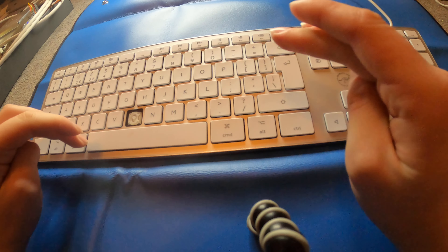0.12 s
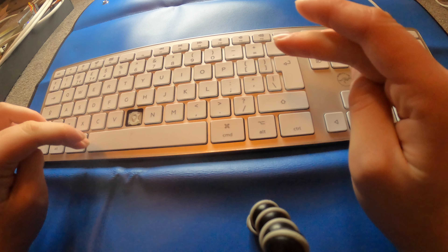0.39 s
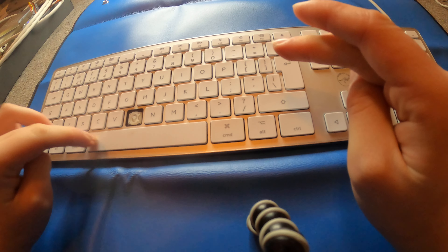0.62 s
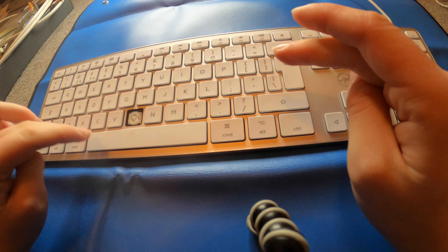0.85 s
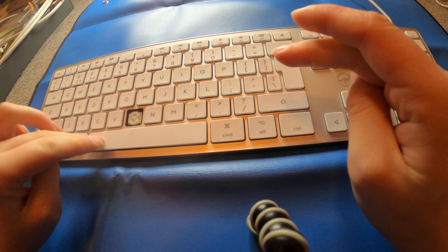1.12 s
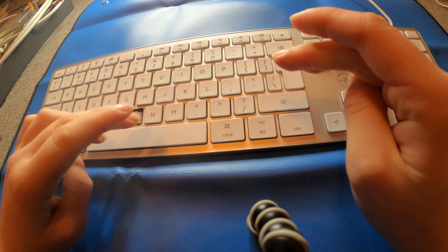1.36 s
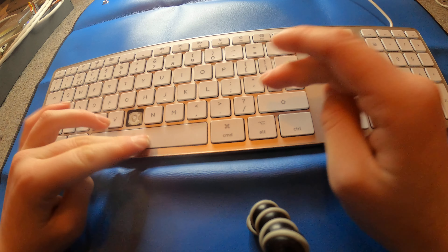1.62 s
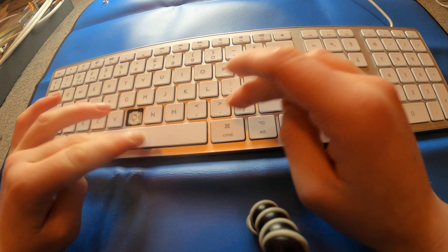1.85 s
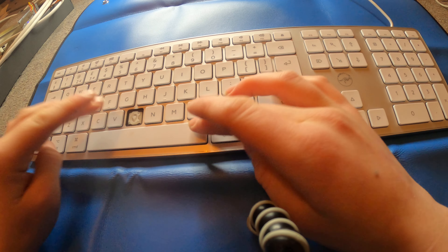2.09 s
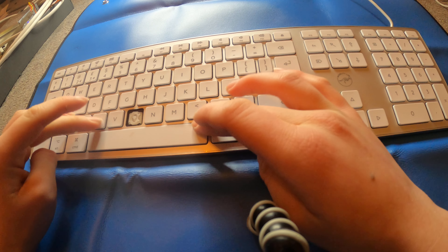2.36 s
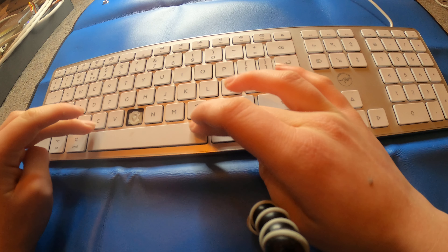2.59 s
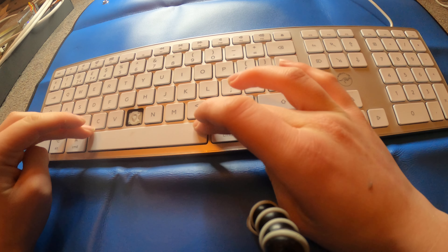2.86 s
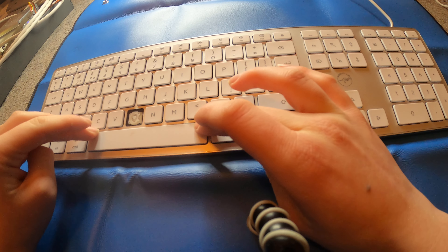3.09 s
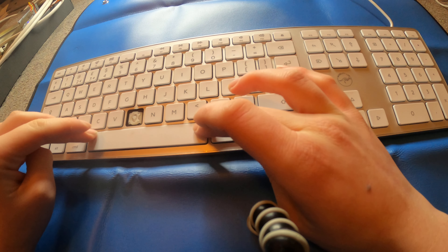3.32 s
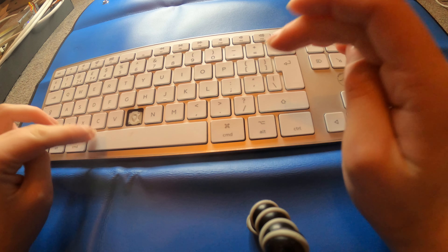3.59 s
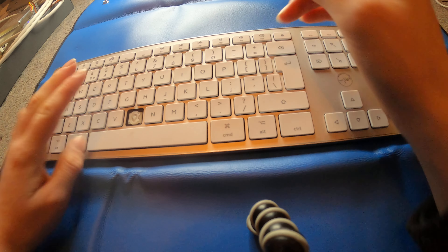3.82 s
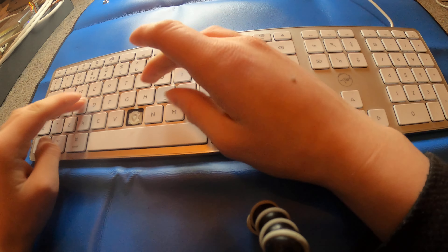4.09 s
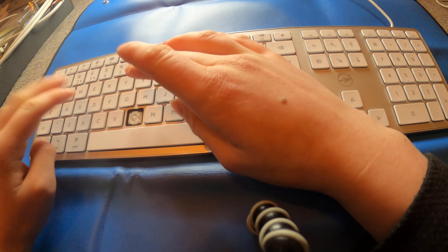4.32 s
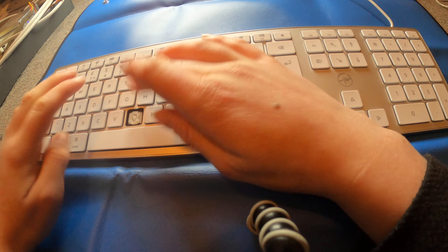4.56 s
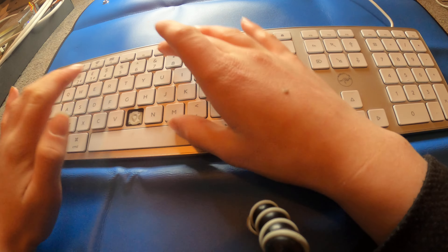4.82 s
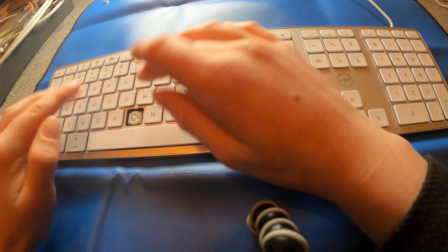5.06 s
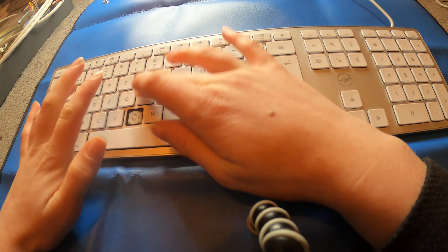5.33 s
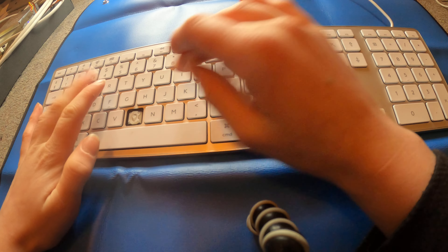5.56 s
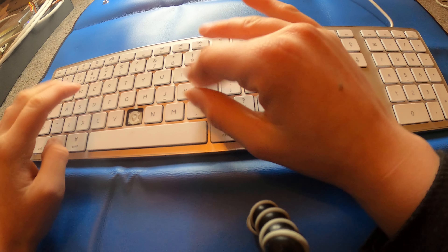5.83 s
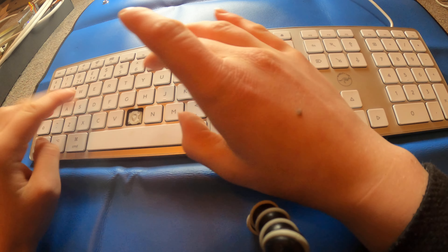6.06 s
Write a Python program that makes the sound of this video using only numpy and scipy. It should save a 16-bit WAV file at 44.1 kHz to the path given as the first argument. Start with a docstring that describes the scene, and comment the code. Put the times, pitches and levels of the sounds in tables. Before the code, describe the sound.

Fingertips tap a thin metal keyboard in uneven bursts, clicky with dull thuds beneath, as hands rustle over cloth and a faint hum fades.

```python
"""Close stereo pickup, about six seconds, of fingertips on a thin metal keyboard with low plastic keys on a padded mat.
It opens on air, a faint wavering low hum and hands rustling over cloth; two firm bursts of typing follow.
Softer keys come next, with loose caps ticking at random; then two firm strokes, settling wrists and a strong sweep of cloth.
The hum has sunk away by then; more typing runs to the end. Each stroke is noisy cap ticks, a ringing knock in the plate,
a damped thud into the mat and a deep shove; a short diffuse tail of noise is the small soft room."""
import sys
import numpy as np
from scipy import signal
from scipy.fft import rfft, irfft
from scipy.io import wavfile

SR = 44100
rng = np.random.default_rng(int(sys.argv[2]) if len(sys.argv) > 2 else 0)


def materialize(psi):
    """Save the field psi as 16-bit PCM at rate SR to the path in sys.argv[1].

    A 1-D psi becomes a single channel; in a 2-D psi each row is a channel.
    """
    bounded = np.clip(np.atleast_2d(psi).T, -1, 1)
    quanta = np.round(bounded * 32767).astype(np.int16)
    wavfile.write(sys.argv[1], SR, quanta)


def nominal_scale(level):
    """Amplitude ratio for a level in decibels (scalar or array-like)."""
    x = np.asarray(level, float) / 20
    return 10 ** x


N = 272538   # length in samples


def rms_one(x):
    """Scales a signal to an rms of 1."""
    return x / np.sqrt(np.mean(x ** 2) + 1e-20)


def at_hz(points, hz):
    """Reads a (Hz, value) curve along a logarithmic pitch axis."""
    curve_hz, value = np.transpose(points)
    return np.interp(np.log(hz), np.log(curve_hz), value)


def drift(rate_hz):
    """Random wander of rms 1: noise through two equal low-pass poles, made at every 40th sample."""
    pole = np.exp(-2 * np.pi * rate_hz * 40 / SR)
    noise = rng.standard_normal(N // 40 + 2002)
    slow = signal.lfilter([1], [1, -2 * pole, pole * pole], noise)[2000:]   # settled part only
    return np.interp(np.arange(N) / 40, np.arange(len(slow)), rms_one(slow))


def coloured(spectrum, alike):
    """Stereo noise of rms 1 with a given spectrum; alike is the left-right correlation."""
    hz = np.maximum(np.fft.rfftfreq(N, 1 / SR), 1)
    white = rfft(rng.standard_normal((2, N)))
    mid, side = irfft(white * nominal_scale(at_hz(spectrum, hz)), N)
    alike = np.clip(alike, 0, 1)
    opposed = side * np.array([[1], [-1]])
    return rms_one(np.sqrt(1 + alike) * mid + np.sqrt(1 - alike) * opposed)


def add(out, s, wave):
    """Mixes a short sound in at a time in seconds."""
    i = round(s * SR)
    out[..., i:i + wave.shape[-1]] += wave[..., :N - i]


# Colour of the air around the microphone. Each row: frequency in Hz, relative density in dB per Hz.
AIR_COLOUR = [(15, -40.5), (25, -7), (90, -7), (213, 6.5), (438, -12), (488, -5), (691, -35), (1630, -20),
              (3260, -25), (7000, -22), (15000, -40)]


def air():
    """Steady background noise, mostly low, identical left and right."""
    return nominal_scale(-69.5) * coloured(AIR_COLOUR, alike=1.0)


# The hum behind the keyboard, joined by straight lines. Each row: time in seconds, pitch in Hz before its jitter,
# level in dB before its flutter, level of the partial a fifth above in dB before its flutter.
HUM_PATH = [(0, 205, -59, -68.5), (.15, 206, -63.5, -73), (.3, 196, -57, -76.5), (.6, 194, -54, -72.5),
            (.8, 196, -59, -72), (1.1, 197, -56, -72.5), (1.35, 201, -63, -70.5), (1.5, 200, -70, -80.5),
            (2.1, 207, -63.5, -86), (2.5, 209, -55.5, -76), (2.9, 210, -58.5, -89.5),
            (3.2, 212, -63, -78.5), (3.5, 215, -84.5, -73.5), (3.9, 212, -74.5, -78.5),
            (4.3, 215, -79.5, -96), (4.6, 220.7, -78.5, -102.5)]


def hum():
    """A low tone with weak partials a fifth above and an octave below, unsteady in pitch and strength."""
    s, *columns = np.transpose(HUM_PATH)
    hz, db, fifth_db = [np.interp(np.arange(N) / SR, s, column) for column in columns]
    phase = 2 * np.pi * np.cumsum(hz * (1 + 0.017 * drift(45))) / SR
    tone = 0
    for ratio, level_db in [(1, db), (3 / 2, fifth_db), (1 / 2, db - 20)]:
        tone = tone + nominal_scale(level_db + 2.4 * drift(8.4)) * np.sin(ratio * phase)
    return np.sqrt(2) * tone


# Hands and sleeves sweeping over cloth. Each row: loudest moment in seconds, level there in dB before grain and drag,
# time to swell by 10 dB in seconds, time to fade by 10 dB in seconds (the sign of both times has no effect).
CLOTH_SWEEPS = [(0, -61.5, .04, -0.0417), (.18, -65.5, -3.0437, 0.0773), (0.421, -78.5, -3.4017, 0.1321),
                (.8, -72, 0.217, 0.52), (1.301, -60.5, -0.0443, 0.0511), (1.7, -61.5, 0.1084, 0.3517),
                (2.2, -64, 0.0408, 0.159), (2.52, -68.5, 0.1718, 0.0948), (2.85, -72.5, 0.1305, 0.24),
                (3.05, -61, 0.0893, 0.1804), (3.56, -60, -0.0068, 0.1958), (3.85, -42.5, 0.1187, 0.1664),
                (4.051, -51, 0.1067, 0.0833), (4.2, -65.5, 0.0668, 0.0008), (4.48, -74.5, 1.2989, 0.0638),
                (4.82, -62.5, 0.1774, 0.357), (5.42, -57, 0.1607, -0.0782), (5.55, -61, 0.0668, 0.1781),
                (5.71, -58, 0.033, 0.195), (6.03, -58.5, 0.0581, 0.1072)]


def sweep_db():
    """Level of all sweeps together; each swells to a rounded top and fades."""
    t, power = np.arange(N) / SR, 1e-12
    for s, db, swell_s, fade_s in CLOTH_SWEEPS:
        fall_db = 10 * ((t - s) / np.where(t < s, swell_s, fade_s)) ** 2
        power = power + nominal_scale(db - fall_db) ** 2
    return 10 * np.log10(power)


# Colour of the cloth before the drag. Each row: frequency in Hz, relative density in dB per Hz.
CLOTH_COLOUR = [(90, -35.5), (200, -2), (450, -5.5), (800, -7), (1500, -0.5), (2300, -5), (3500, -10),
                (6000, -22.5), (9000, -31.5), (15000, -51.5)]


def rustle():
    """Friction noise that catches and slips; a firm sweep drags the cloth and fills in the lows."""
    db = sweep_db()
    noise = coloured(CLOTH_COLOUR, alike=0.78)
    lows = signal.sosfilt(signal.butter(2, 900, fs=SR, output="sos"), noise)
    drag = nominal_scale(np.minimum(0.17 * (db + 50.5), 3.5))   # below 1, and so thinner lows, in a light sweep
    grain = nominal_scale(2.3 * drift(150) + 1.5 * drift(12))
    return nominal_scale(db) * grain * (noise + (drag - 1) * lows)


# How long the small room rings. Each row: frequency in Hz, time to fall by 60 dB in seconds.
ROOM_DECAY = [(100, 0.44), (400, 0.37), (1200, 0.27), (3000, 0.19), (7000, 0.12), (14000, 0.07)]


def room(x):
    """A diffuse noise tail, dying at its own rate in each half-octave, answers the sound."""
    t, tail = np.arange(int(.5 * SR)) / SR, 0
    edges = 60 * 2 ** np.arange(0, 8.1, .5)   # Hz
    white = rng.standard_normal((3, len(t)))
    white = white[0] + 1.6 * white[1:]      # both sides share part of the tail
    for low, high in zip(edges, edges[1:]):
        band = signal.sosfilt(signal.butter(2, [low, high], "band", fs=SR, output="sos"), white)
        tail = tail + band * nominal_scale(-60 * t / at_hz(ROOM_DECAY, np.sqrt(low * high)))
    tail = tail * (1 - np.exp(-(t / 0.0033) ** 2))   # soft onset
    tail = nominal_scale(-16.5) * tail / np.sqrt(np.sum(tail ** 2) / 2)
    return signal.fftconvolve(x, tail, axes=1)[:, :N]


# Fingertips landing on a cap, or a cap first coming loose. Each row: time in seconds, cap tick level in dB.
TOUCH_ROWS = [(0.3093, -38.5), (.323, -37.5), (0.3332, -29.5), (0.526, -14.5), (0.6814, -19.5),
              (0.8495, -11), (1.002, -14), (1.16, -13), (1.5332, -14.5), (1.6223, -40), (1.7107, -26.5),
              (1.7712, -28), (1.849, -21), (1.92, -27), (1.9825, -35), (2.0602, -25.5), (2.2176, -37.5),
              (2.389, -44), (2.4281, -21), (2.5473, -43), (2.5832, -36.5), (3.2312, -47), (3.2708, -36),
              (3.4014, -34), (3.5465, -13.5), (3.7156, -11), (3.9489, -39.5), (4.1106, -33), (4.6872, -38),
              (4.889, -9.5), (5.2159, -32.5), (5.28, -35), (5.3679, -37.5), (5.5038, -40), (5.564, -45.5),
              (5.598, -47), (5.7832, -22), (5.8433, -20), (6.0396, -15.5), (6.1219, -41.5), (6.1302, -38)]
# Keys reaching the bottom of their travel. Each row: time in seconds, cap tick level in dB, plate knock level in dB,
# where the plate rings most in Hz, thud level in dB, thud pitch in Hz.
PRESS_ROWS = [(0.3361, -33, -45.5, 1480, -43, 234.9), (0.528, -17, -29, 981.8, -23.5, 176.2),
              (0.6847, -12.5, -27.5, 1780, -28, 163.5), (.853, -7.5, -17.5, 1969, -20.5, 165.9),
              (1.0068, -9.5, -23.5, 1209, -25, 195.9), (1.163, -18.5, -31.5, 1400, -33, 143),
              (1.5372, -16, -17.5, 2700, -28.5, 228.6), (1.716, -9.5, -16, 1160, -31.5, 233.2),
              (1.851, -12, -12.5, 2933, -32.5, 314.1), (1.9887, -13, -18, 2713, -28.5, 300.4),
              (2.2222, -41.5, -43, 1250, -45, 199.2), (2.4349, -15, -26, 1104, -26.5, 206.4),
              (2.5876, -26.5, -34.5, 1795, -37.5, 214.7), (2.714, -29, -40.5, 1818, -38.5, 182),
              (2.846, -33, -41.5, 1286, -37.5, 199), (2.9857, -32.5, -39, 1600, -35.5, 193.1),
              (3.1308, -32.5, -36, 1300, -37.5, 197.2), (3.283, -31.5, -37, 1678, -31.5, 191.8),
              (3.409, -27.5, -34, 3062, -34, 213.4), (3.5527, -18.5, -21.5, 1900, -24, 280.2),
              (3.7217, -16, -18.5, 1282, -24, 268), (4.1122, -37, -35, 2154, -50.5, 230.4),
              (4.3102, -34.5, -46.5, 3390, -53.5, 143), (4.388, -38, -41, 1650, -49, 161),
              (4.694, -28, -30.5, 1807, -37.5, 177.5), (4.8154, -13.5, -11.5, 3040, -32, 143),
              (4.8952, -15, -13.5, 1331, -26, 176.6), (4.963, -17.5, -22.5, 1070, -26.5, 236.6),
              (5.2259, -36, -36.5, 1415, -39, 149.1), (5.2827, -26.5, -25, 1960, -41, 150.3),
              (5.3715, -26.5, -21, 1817, -31.5, 141), (5.512, -36.5, -27.5, 1250, -34.5, 149.3),
              (5.7846, -20, -14, 2140, -42.5, 143), (5.851, -29.5, -27.5, 1620, -32.5, 151.1),
              (6.0424, -31.5, -27.5, 3102, -29, 118.9)]
# Lighter clicks: keys springing back and caps being brushed. Each row: time in seconds, cap tick level in dB,
# plate knock level in dB, thud level in dB.
CLICK_ROWS = [(0.4258, -47.5, -57.5, -67.5), (0.9106, -42.5, -34, -58), (1.09, -40.5, -53, -59),
              (1.1868, -18, -28.5, -40.5), (1.224, -21, -29.5, -26), (1.6338, -25, -45, -28.5),
              (1.7757, -23, -29.5, -24.5), (1.9226, -22.5, -29.5, -28.5), (2.065, -27.5, -31, -25.5),
              (2.348, -38.5, -48.5, -58.5), (2.4845, -41.5, -45, -59), (2.771, -42, -49, -57.5),
              (3.0556, -34.5, -44, -58.5), (3.2444, -38.5, -46.5, -46), (3.3691, -40.5, -49, -57.5),
              (3.4953, -36, -52.5, -41.5), (3.6471, -44.5, -53, -60), (3.802, -45, -31, -59.5),
              (3.9376, -36, -38.5, -40), (4.1602, -41, -47.5, -46.5), (4.7292, -27.5, -30, -54.5),
              (4.746, -36.5, -53, -60), (4.834, -40, -43.5, -59.5), (5.0201, -33, -50.5, -60),
              (5.0885, -52.5, -50, -43.5), (5.141, -42.5, -48.5, -56.5), (5.337, -48, -62.5, -60.5),
              (5.388, -33, -60, -59.5), (5.4373, -38, -44.5, -58), (5.5772, -40.5, -45, -43),
              (5.9268, -41.5, -45.5, -39.5), (5.9798, -35.5, -40, -56.5), (6.125, -41.5, -52, -39.5)]
# Dull little knocks from resting fingers. Each row: time in seconds, plate knock level in dB.
NUDGE_ROWS = [(.1855, -52.5), (2.1145, -54), (2.5249, -44), (2.8109, -45.5), (2.8892, -46), (2.9147, -53.5),
              (3.1828, -50.5), (3.2206, -46.5), (3.8447, -38), (4.3277, -50), (5.136, -46), (5.805, -42.5),
              (5.9977, -46)]


def contacts():
    """Every contact on the board as (s, tick dB, knock dB, plate Hz); each press and lighter click bounces once."""
    touches = [(s, db, db - 18, 2700) for s, db in TOUCH_ROWS]   # barely knock the plate
    blows = [row[:4] for row in PRESS_ROWS] + [(*row[:3], 1900) for row in CLICK_ROWS]
    bounces = []
    for (s, tick_db, knock_db, _), late in zip(blows, rng.standard_normal(len(blows))):
        delay_s = .008 * np.exp(.25 * late)
        bounces.append((s + delay_s, tick_db - 22, knock_db - 17, 1434))
    nudges = [(s, db - 16.5, db, 1173.3) for s, db in NUDGE_ROWS]   # barely tick
    # Loose caps tick at random under resting fingers.
    count = 16
    when = rng.uniform(2.0, 3.7, count)
    spread_db = rng.standard_normal((count, 2))
    fidgets = [(s, -53.5 + a, -63 + b, 1500) for s, (a, b) in zip(when, spread_db)]
    return np.array(touches + blows + bounces + nudges + fidgets)


# Loose neighbouring caps chattering. Each row: frequency in Hz, relative density in dB per Hz.
CAP_GRIT = [(1500, -24), (3000, -16.5), (4500, -6.5), (6600, -3), (8500, -8), (12900, -30), (16000, -43)]
# The plate under them chattering. Each row: frequency in Hz, relative density in dB per Hz.
PLATE_GRIT = [(200, -20.5), (500, 0.5), (780, -7), (1400, -3), (2500, -11), (3600, -8.5), (6000, -49.5)]


def grit(blows_s, blows_db, colour, swell_db, swell_s, after_db, t60, alike):
    """Dense noise: a short swell leads into each contact, and the board buzzes on after it."""
    since = np.arange(-.03 * SR, .35 * SR) / SR
    swell = nominal_scale(swell_db) * np.exp(since / swell_s)
    after = nominal_scale(after_db - 60 * since / t60)
    envelope = np.where(since < 0, swell, after)
    power = np.zeros(N)
    for s, db in zip(blows_s, blows_db):
        add(power, s + since[0], (nominal_scale(db) * envelope) ** 2)
    return np.sqrt(power) * nominal_scale(2.5 * drift(200)) * coloured(colour, alike)


def chatter(taps):
    """Loose caps and the plate each answer every contact with their own grit; the caps spread wider in stereo."""
    s, tick_db, knock_db, _ = taps.T
    caps = grit(s, tick_db, CAP_GRIT, swell_db=-25.5, swell_s=0.0062, after_db=-32.5, t60=0.244, alike=0.43)
    plate = grit(s, knock_db, PLATE_GRIT, swell_db=-34.0, swell_s=0.0026, after_db=-18.5, t60=0.14117, alike=0.98)
    return caps + plate


LEAD_S = .008   # noise ahead of the contact in every struck ring


def struck(modes, favoured_hz, focus_db, spread_db, rattle_s, rattle_db, creep_db):
    """One modal ring per blow, peak 1, driven by a brief noisy creep, the contact at LEAD_S and a noisy rattle.
    focus_db, per octave squared from the favoured pitch, weakens modes (by 11 dB at most); below 0 it lifts them."""
    hz, level_db, t60 = np.transpose(modes)
    count = len(modes)
    t = np.arange(int(min(.2, 2 * t60.max()) * SR))[:, None] / SR
    since = np.arange(800) / SR - LEAD_S
    creep = nominal_scale(creep_db) * np.exp(since / .0012)
    shape = np.where(since < 0, creep, nominal_scale(rattle_db) * np.exp(-since / rattle_s))
    signs = (-1) ** np.arange(count)      # neighbouring modes swing in opposition
    draws = rng.standard_normal((len(favoured_hz), 2 * count + len(since)))
    rings = []
    for centre_hz, draw in zip(favoured_hz, draws):
        strength, shift, rattle = np.split(draw, [count, 2 * count])
        blow_hz = hz * np.exp(.05 * shift)
        waves = np.sin(2 * np.pi * blow_hz * t) * nominal_scale(-60 * t / t60)
        force = rattle * shape
        force[round(LEAD_S * SR)] = 1
        off_centre_db = np.minimum(focus_db * np.log2(hz / centre_hz) ** 2, 11)
        gains = nominal_scale(level_db + spread_db * strength - off_centre_db)
        ring = signal.fftconvolve(waves @ (gains * signs), force)
        rings.append(ring / np.abs(ring).max())
    return np.array(rings)


# Wrists settling on the mat. Each row: time in seconds, level in dB, pitch in Hz.
WRIST_ROWS = [(3.732, -36, 36), (3.931, -41, 76.71), (4.107, -41, 54.78), (4.305, -46.5, 56)]


def shoves():
    """A slow push through mat and stand, starting just before each press, and under each settling wrist."""
    t, out = np.arange(int(.2 * SR)) / SR, np.zeros(N)
    pitches = 48 * np.exp(.2 * rng.standard_normal(len(PRESS_ROWS)))   # Hz
    pushes = []
    for (s, _, knock_db, _, thud_db, _), hz in zip(PRESS_ROWS, pitches):
        # The push follows only part of the swing in knock and thud level.
        pushes.append((s - .008, -13 + 0.62063 * knock_db + .3 * thud_db, hz))
    for s, db, hz in pushes + WRIST_ROWS:
        push = np.sin(2 * np.pi * hz * t) * (t / 0.008) * np.exp(1 - t / 0.0071188)
        add(out, s, nominal_scale(db) * push)
    return out


# Lingering modes of the board on its mat. Each row: frequency in Hz before a small random shift,
# relative level in dB, time to fall by 60 dB in seconds.
MAT_MODES = [(143, -11, 0.16), (203.95, -7.5, 0.13), (297.66, -7.5, 0.08), (398.91, -7, 0.06667)]


def thuds():
    """A damped swing of the board on the mat, with its lingering modes, under each press and lighter click."""
    t, out = np.arange(int(.2 * SR)) / SR, np.zeros(N)
    early_s, click_hz = .004, 151.57
    blows = [(row[0], *row[4:]) for row in PRESS_ROWS] + [(row[0], row[-1], click_hz) for row in CLICK_ROWS]
    pitches = np.array(blows)[:, 2]
    rings = struck(MAT_MODES, pitches, focus_db=-1, spread_db=1.5, rattle_s=0.0054, rattle_db=-15.0, creep_db=-29.5)
    for (s, db, hz), ring in zip(blows, rings):
        swing = -np.sin(2 * np.pi * hz * t) * np.exp(-t / 0.0055282) * (1 - np.exp(-t / 0.0026))
        add(out, s - early_s, nominal_scale(db + 6.5) * swing)
        add(out, s - early_s - LEAD_S, nominal_scale(db - 6) * ring)
    return out


# Resonances of a plastic key cap. Each row: frequency in Hz before a small random shift,
# relative level in dB, time to fall by 60 dB in seconds.
CAP_MODES = [(4300, -5, .005), (5300, -4, .005), (6200, 0, .005), (7000, -1, .005), (7900, -5, .004),
             (9000, -8, .003), (10500, -16, .002), (12300, -19, .0015), (14500, -24, .001)]
# Resonances of the metal plate. Each row: frequency in Hz before a small random shift,
# relative level in dB, time to fall by 60 dB in seconds.
PLATE_MODES = [(520, -4, .018), (700, -3, .014), (990, -2, .013), (1300, -3, .011), (1690, 0, .01),
               (2150, 0, .009), (2650, -2, .007), (3400, 0, .007)]


def keys(taps):
    """Cap tick and plate knock at each contact, scattered a little across the board; the knock leans left."""
    knock_hz = taps[:, 3]
    ticks = struck(CAP_MODES, knock_hz, focus_db=-2, spread_db=3.5, rattle_s=0.0019358, rattle_db=-15.5, creep_db=-18.5)
    knocks = struck(PLATE_MODES, knock_hz, focus_db=3.5, spread_db=3.0, rattle_s=0.0025, rattle_db=-14.5, creep_db=-23.0)
    pans_db = 1.1 * rng.standard_normal(len(taps))
    lean_db = np.array([[.6], [-.6]])
    out = np.zeros((2, N))
    for (s, tick_db, knock_db, _), tick, knock, pan_db in zip(taps, ticks, knocks, pans_db):
        sides = nominal_scale([[pan_db / 2], [-pan_db / 2]])
        add(out, s - LEAD_S - .0004, sides * nominal_scale(tick_db + 1.0) * tick)
        add(out, s - LEAD_S - .0006, sides * nominal_scale(knock_db + 1.0 + lean_db) * knock)
    return out


def scene():
    """Air, hum and rustle behind the board, with the room answering the board alone."""
    taps = contacts()
    board = keys(taps) + thuds() + shoves() + chatter(taps)
    return air() + hum() + rustle() + room(board) + board


def low_pass(x):
    """Removes everything above the highest recorded frequency."""
    return signal.sosfilt(signal.butter(12, 16640, fs=SR, output="sos"), x)


def record(dry):
    """Two close microphone ports: the left hears a little later and loses more of the top treble."""
    top_side_db, top_hz, left_lag_s, capsule_cut_hz = -5, 11000, 1.4e-5, 15600
    hz = np.fft.rfftfreq(N, 1 / SR)
    shade = nominal_scale(top_side_db / (1 + (top_hz / (hz + 1)) ** 6))
    lag = np.exp(-2j * np.pi * hz * left_lag_s)
    left = irfft(rfft(dry[0]) * shade * lag, N)
    ports = np.array([left, dry[1]])
    mix = signal.sosfilt(signal.butter(4, capsule_cut_hz, fs=SR, output="sos"), ports)
    return low_pass(mix)


dry = scene()
out = record(dry)
materialize(out)
```